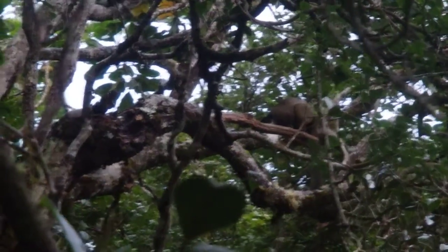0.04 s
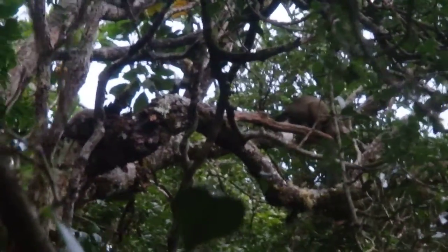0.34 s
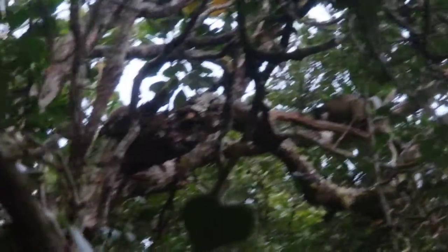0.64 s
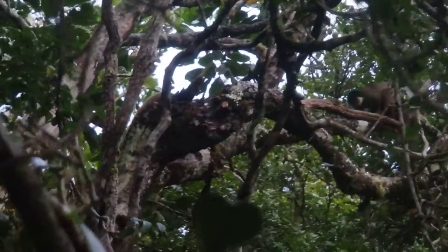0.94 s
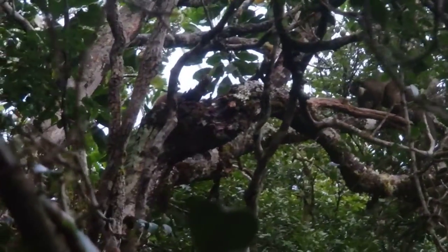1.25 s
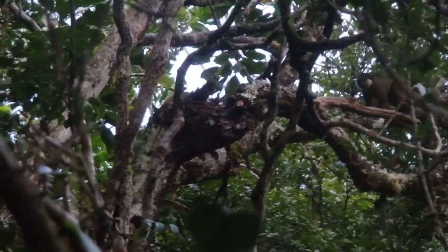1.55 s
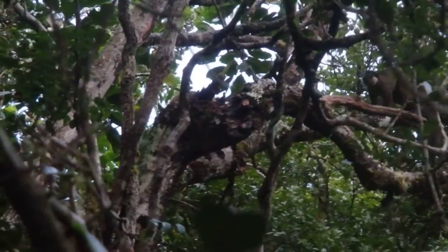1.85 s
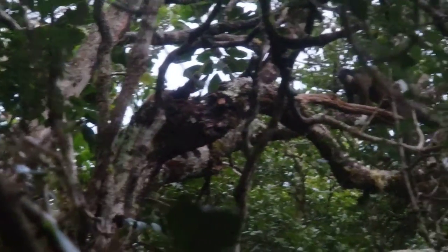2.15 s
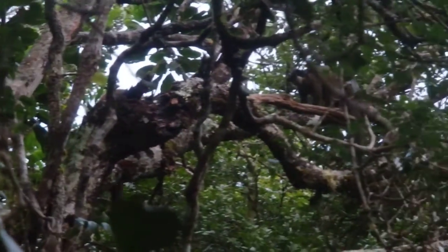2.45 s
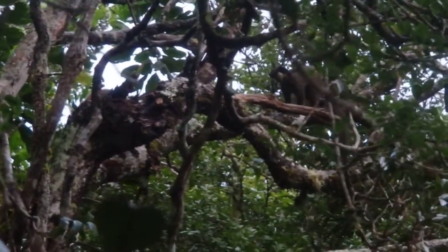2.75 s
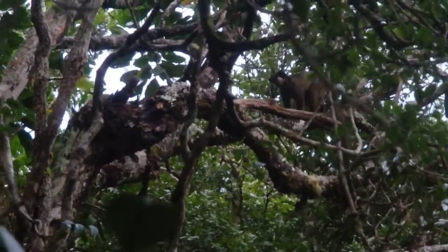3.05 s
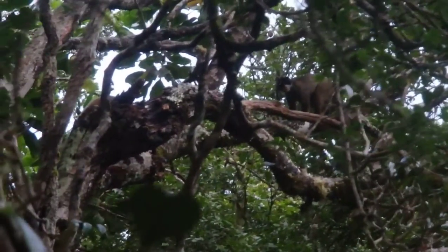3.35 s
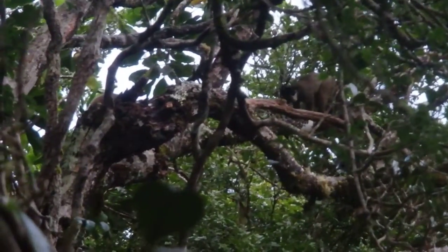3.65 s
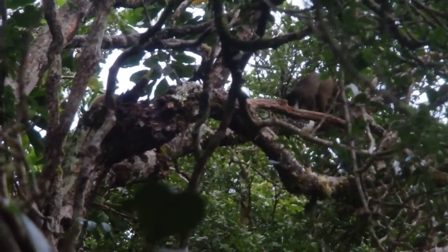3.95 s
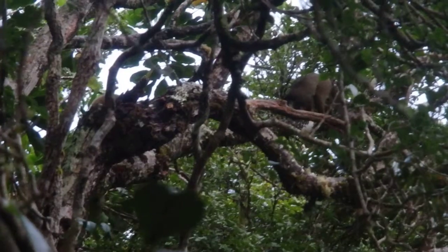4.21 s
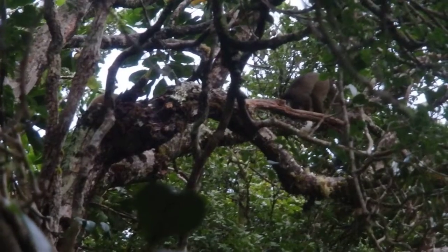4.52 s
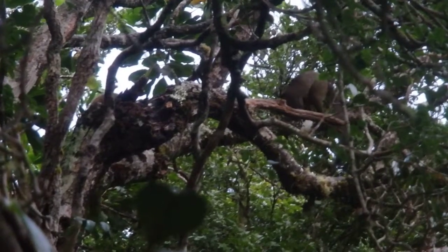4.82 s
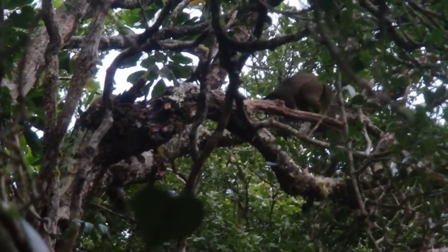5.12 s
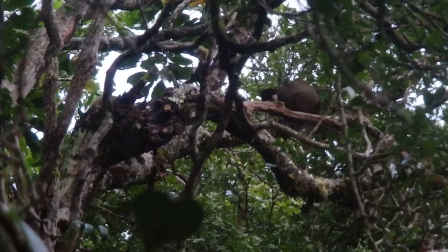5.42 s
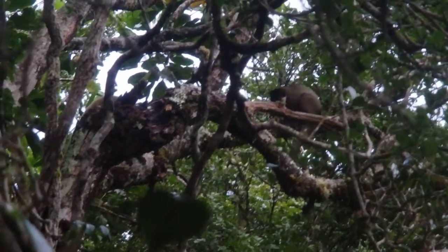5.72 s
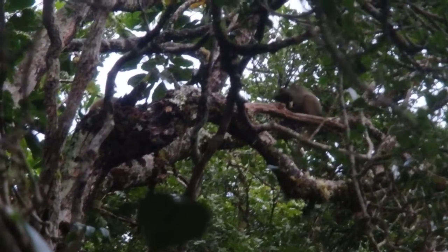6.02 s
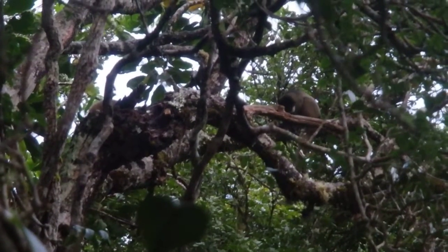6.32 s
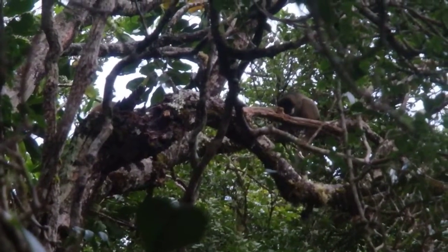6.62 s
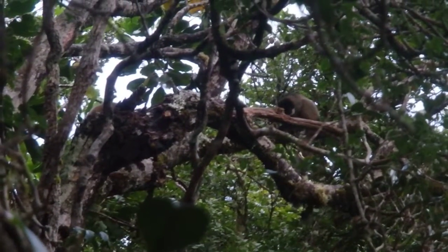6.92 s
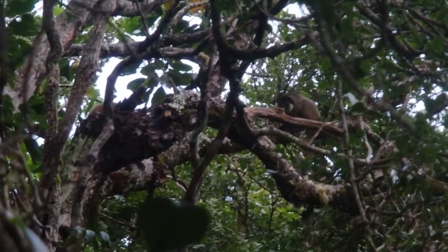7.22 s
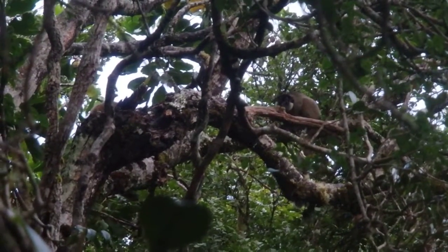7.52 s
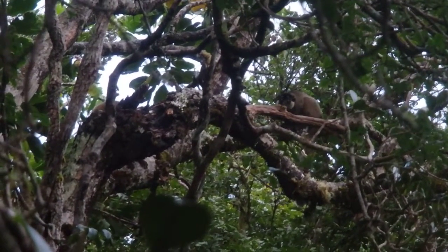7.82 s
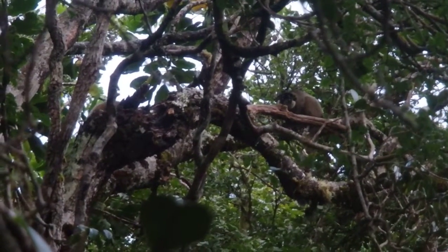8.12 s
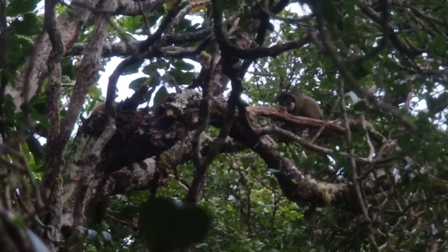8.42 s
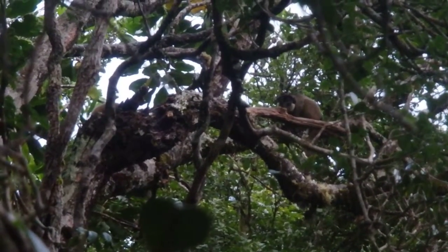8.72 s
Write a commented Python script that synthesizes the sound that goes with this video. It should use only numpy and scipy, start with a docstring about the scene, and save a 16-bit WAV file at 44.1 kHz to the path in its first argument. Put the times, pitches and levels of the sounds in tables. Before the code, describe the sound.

A lemur in a rain forest gives a series of short, hoarse, rattling grunts. It barks once, roughly, goes straight into a harsh drawn-out call, then returns to softer grunts. Trees scatter each call into a short tail. High insect trills repeat steadily over a low hush of air and leaves. Drops tick on foliage, and near the start one thuds on the microphone's housing.

```python
"""A lemur on a rain forest branch grunts, barks once, draws out a harsh rasping call and grunts again.
Its vocal folds snap in puffs of hoarse air for the grunts and pulse roughly for the bark and the call,
ringing in its throat. Insects trill and pip over the hush of the forest; drops tick on leaves and
thud on the camera body. Trunks and foliage scatter each call into a short tail."""
import sys
import numpy as np
from scipy import signal
from scipy.fft import rfft, irfft
from scipy.io import wavfile
from scipy.ndimage import uniform_filter1d

SR = 44100
rng = np.random.default_rng(int(sys.argv[2]) if len(sys.argv) > 2 else 0)


def pcm_store(signal):
    """Save signal as 16-bit PCM."""
    levels = np.round(np.clip(np.atleast_2d(signal), -1, 1) * 32767)
    wavfile.write(sys.argv[1], SR, levels.astype(np.int16).T)


N = 386316


def gain_of(db):
    """Decibels to amplitude."""
    return 10 ** (np.asarray(db) / 20)


def unit_rms(x):
    """Scales to rms 1."""
    return x / np.sqrt(np.mean(x ** 2) + 1e-20)


def curve_at(points, hz):
    """Reads a curve on a log-frequency axis."""
    f, value = np.transpose(points)
    return np.interp(np.log(hz + 1), np.log(f + 1), value)


def add(mix, s, sound):
    """Mixes a sound in at time s."""
    part = mix[..., max(round(s * SR), 0):][..., :sound.shape[-1]]
    part += sound[..., :part.shape[-1]]


def pan(side_db):
    """Left and right gains; positive leans left."""
    return gain_of([[side_db / 2], [-side_db / 2]])


def noise(colour):
    """Noise of rms 1 with the given colour."""
    eq = gain_of(curve_at(colour, np.fft.rfftfreq(N, 1 / SR)))
    return unit_rms(irfft(rfft(rng.standard_normal(N)) * eq, N))


def wander(n, per_s):
    """Smooth random modulation of rms 1."""
    at = np.arange(n) * per_s / SR
    return unit_rms(np.interp(at, np.arange(8192), rng.standard_normal(8192)))


def resonate(x, hz, width):
    """A steep resonance of gain 1 that follows the curve hz."""
    turn = np.exp(2j * np.pi * np.cumsum(hz * np.ones(len(x))) / SR)
    r = np.exp(-np.pi * width / SR)
    return 2 * (turn * signal.lfilter([(1 - r) ** 2], [1, -2 * r, r * r], x / turn + 1e-18)).real


# Stereo image of the forest, narrow lows and wide highs: (frequency [Hz], left-right correlation [0-1])
FOREST_IMAGE = [(40, 0.76), (160, 0.96), (450, 0.96), (1200, 0.9), (2000, 0.79), (3300, 0), (15000, 0)]
# Reverb time among the trees: (frequency [Hz], t60 [s])
FOREST_DECAY = [(200, 0.4), (1500, 0.32), (4000, 0.5), (9000, 0.14)]


def forest_reverb(x, fade_in_s=.0013, count=1500, spacing=22):
    """Scattering from trunks and leaves: sparse taps, each band dying at its own speed."""
    at = np.arange(count) * spacing + rng.integers(0, spacing, (2, count))
    taps = np.zeros((2, SR))
    np.put_along_axis(taps, at, rng.standard_normal(at.shape), 1)
    hz, t, bands = signal.stft(taps, SR, nperseg=256)
    alike = curve_at(FOREST_IMAGE, hz)[:, None]
    bands[1] = alike * bands[0] + np.sqrt(1 - alike ** 2) * bands[1]
    envelope = gain_of(-60 * t / curve_at(FOREST_DECAY, hz)[:, None]) * np.minimum(t / fade_in_s, 1)
    tail = signal.istft(bands * envelope, SR, nperseg=256)[1]
    return signal.fftconvolve(x[None], tail / np.linalg.norm(tail[0]), axes=1)[:, :N]


# Colour of the bed of air and leaves: (frequency [Hz], relative level [dB])
HUSH_COLOUR = [(15, -38), (25, -8.5), (107, -4), (248, -6.5), (291, -7), (392, -10), (857, -14),
               (1590, -16), (2590, -14), (3130, -20), (4210, -36), (5520, -27), (5980, -29), (11400, -28.5),
               (15800, -27)]
# Its lean across the image: (frequency [Hz], left over right [dB])
HUSH_PAN = [(60, -1.5), (300, -1.1), (2600, -2), (3600, -4), (4400, 22), (5200, 0.5), (14000, -1.5)]


def hush(level_db=-40.5, patchy_db=1.4):
    """Distant air and leaves: a noise bed that swells in small patches of time and frequency."""
    frames, hz = N // 256 + 5, np.fft.rfftfreq(1024, 1 / SR)
    a, b, c, d, patches = rng.standard_normal((frames, 513, 5)).T
    patches = unit_rms(uniform_filter1d(uniform_filter1d(patches, size=10, axis=0), size=12, axis=1))
    alike = curve_at(FOREST_IMAGE, hz)[:, None]
    left = a + 1j * b
    right = alike * left + np.sqrt(1 - alike ** 2) * (c + 1j * d)
    lean = gain_of(curve_at(HUSH_PAN, hz)[:, None] / 2)
    bands = np.array([left * lean, right / lean])
    bands *= gain_of(curve_at(HUSH_COLOUR, hz)[:, None] + patchy_db * patches)
    return gain_of(level_db) * unit_rms(signal.istft(bands, nperseg=1024, noverlap=768)[1][:, :N])


# Colour of the far insects: (frequency [Hz], relative level [dB])
CHORUS_COLOUR = [(2000, -54), (2650, 5.5), (3150, -1), (3400, -19), (3520, 8.5), (3700, 1.5), (4080, 6),
                 (4500, -4.5), (4750, -32)]


def insect_chorus(level_db=-49, flicker_db=2.2):
    """Far insects blur into a wide, flickering band of noise."""
    blur = np.array([noise(CHORUS_COLOUR), noise(CHORUS_COLOUR)])
    return pan(4) * blur * gain_of(level_db + flicker_db * wander(N, 40))


# Thin far whistles: (time [s], length [s], start pitch [Hz], end pitch [Hz], level [dB])
FAR_WHISTLES = [(0.915, 0.19, 4680, 4700, -55), (3.387, 0.25, 4760, 4750, -54),
                (5.76, 0.25, 4760, 4700, -55), (8.167, 0.28, 4760, 4700, -55),
                (.515, 0.047, 2520, 2370, -48), (2.83, 0.074, 2730, 2490, -45),
                (2.984, .07, 2610, 2330, -47), (5.21, 0.086, 2760, 2530, -45),
                (5.37, 0.075, 2720, 2590, -47)]


def whistles_and_pips(pip_s=.052, pip_hz=6230, pip_db=-60, wet_db=-16):
    """Far whistles, and an insect that pips faintly at uneven gaps."""
    out = np.zeros(N)
    gaps = .091 * rng.choice([1.2, 1, 2, 3], size=84)
    pips = [(s, pip_s, pip_hz, pip_hz, pip_db) for s in np.cumsum(gaps)]
    for s, length, start_hz, end_hz, db in FAR_WHISTLES + pips:
        n = round(length * SR)
        hz = np.linspace(start_hz, end_hz, n) * (1 + .0032 * wander(n, 220))
        add(out, s, gain_of(db) * signal.windows.tukey(n, .7) * np.sin(2 * np.pi * np.cumsum(hz) / SR))
    return pan(2.5) * (out + gain_of(wet_db) * forest_reverb(out))


# Cues for the far insect's trills: (time [s])
FAR_TRILL_CUES = [0.12, 0.871, 1.581, 2.30, 3.021, 5.10, 5.779, 6.489, 7.192, 7.879, 8.59]
# Cues for the near insect's trills: (time [s])
NEAR_TRILL_CUES = [0.213, 0.944, 1.681, 2.413, 3.109, 3.82, 4.529, 5.238, 5.937, 6.635, 7.370, 8.069]


def insect_trills(cues, top_hz, db, side_db, wet_db, note_s=.03, step_s=.0388, arch_hz=640):
    """Seven arched notes a trill, each falling further than it rose."""
    out, u = np.zeros(N), np.linspace(-1, 1, round(note_s * SR))
    for s in cues:
        for k, (tune, strength) in enumerate(rng.standard_normal((7, 2))):
            hz = top_hz * (1 + .0045 * tune) - arch_hz * (u + .14) ** 2
            note = np.cos(np.pi * u / 2) * np.sin(2 * np.pi * np.cumsum(hz) / SR)
            add(out, s + k * step_s - note_s / 2, gain_of(db + .23 * strength) * note)
    direct = np.array([out, np.roll(out, shift=3)])  # the right side hears it just later
    return pan(side_db) * (direct + gain_of(wet_db) * forest_reverb(out))


# Modes of a struck leaf: (frequency [ratio], rise and fall time [s], level [dB])
LEAF_MODES = [(0.987, 0.00039, -5), (0.8, 0.00021, -1), (1.64, 0.0004, -37), (1.6, 0.00012, -11.5),
              (0.75, 0.0024, -25.5)]
# Close drops on leaves: (time [s], gain [dB], pitch [Hz], left over right [dB])
NEAR_DRIPS = [(0.198, -24, 2700, 2), (.999, -23, 2600, 0), (5.7972, -23.5, 2630, 0),
              (5.8363, -22.5, 2700, 4), (6.9030, -23, 2500, 0), (7.037, -21, 2610, -2),
              (7.1606, -23, 3700, 13), (7.171, -24, 2400, -2), (7.392, -20.5, 2940, -10),
              (7.4673, -6, 3500, -10.5)]


def leaf_drips(splash_db=-29, far_per_s=9, far_db=-42):
    """Drops tick on leaves with a tiny splash, a few near and many far."""
    out, t = np.zeros((2, N)), np.arange(2048) / SR
    draws = rng.random((400, 4))[:round(far_per_s * N / SR)]
    far = [(when * N / SR, far_db + 9 * size, 2200 + 1500 * tune, 8 * (side - .5))
           for when, size, tune, side in draws]
    for s, db, hz, side_db in NEAR_DRIPS + far:
        tick = sum(gain_of(mode_db) * t / ring * np.exp(1 - t / ring) * np.sin(2 * np.pi * hz * ratio * t)
                   for ratio, ring, mode_db in LEAF_MODES)
        splash = gain_of(splash_db) * np.exp(-t / .0038) * rng.standard_normal(len(t))
        add(out, s, gain_of(db) * pan(side_db) * (tick + splash) / np.sqrt(2))
    return out


# Modes of the camera body: (frequency [Hz], t60 [s], level [dB])
CAMERA_MODES = [(136, 0.016, -2), (430, 0.0023, -1), (1630, .004, -25), (2920, 0.0073, -19)]
# Drops that hit it: (time [s], gain [dB], time stretch [ratio])
CAMERA_HITS = [(0.34, -1, 0.99), (7.391, -19.5, 2.1)]


def camera_knocks(attack_s=.00045):
    """Drops thud on the camera body; a softer hit is longer and lower."""
    out, t = np.zeros(N), np.arange(2048) / SR
    thud = sum(gain_of(db - 60 * t / t60) * np.cos(2 * np.pi * hz * t) for hz, t60, db in CAMERA_MODES)
    thud *= np.sin(np.pi / 2 * np.minimum(t / attack_s, 1)) ** 2  # water lands softly
    for s, db, stretch in CAMERA_HITS:
        add(out, s, gain_of(db) * np.interp(t / stretch, t, thud))
    return out


# The lemur's throat with the mouth nearly shut: (frequency [Hz], width [Hz], level [dB])
SHUT_FORMANTS = [(1937, 65, 0), (1615, 22, -24), (2730, 600, -18), (3620, 43, -18.5), (4050, 280, -32),
                 (5550, 990, -31), (7500, 700, -51)]


def snap(db, hz, swell_s=.0012):
    """One snap of the vocal folds swells, then rings in the throat, its main formant tuned to hz."""
    t = np.arange(2048) / SR
    rise, after = np.minimum(t / swell_s, 1), np.maximum(t - swell_s, 0)
    tune = hz / SHUT_FORMANTS[0][0]
    ring = sum(gain_of(mode_db) * np.exp(-np.pi * width * after)
               * np.sin(2 * np.pi * (f * tune * t + rng.random())) for f, width, mode_db in SHUT_FORMANTS)
    return gain_of(db) * rise * ring


# Full grunts, each a rattle in a puff of air: (time [s], build-up [s], snap gap [s], snap level [dB],
# decay [dB/s], main formant [Hz], rasp [dB], hiss [dB], whistle [dB])
FULL_GRUNTS = [(.2330, 0, .0131, -11.5, 380, 1876, -29.5, -37, -38),
               (.7842, 0.017, 0.011, -10.5, 600, 1873, -30, -28.5, -26.5),
               (1.7271, 0, 0.02, -8, 270, 2056, -23, -34, -33),
               (2.4186, 0, 0.012, -8, 173, 1943, -19.5, -23, -36),
               (3.162, .018, .0086, -3, 332, 2025, -17, -23, -24.5),
               (7.763, 0.011, 0.0085, -17.5, 110, 1900, -25, -27, -29),
               (8.4907, 0.012, 0.012, -12, 304, 1840, -28, -25.5, -36)]
# Double clicks that end most soft grunts:
# (time [s], gap [s], second click [dB], main formant [Hz], rasp [dB], hiss [dB])
THROAT_CLICKS = [(5.6544, .0285, -23.5, 1927, -21.5, -28), (6.2182, 0.021, -24.5, 2006, -30, -44),
                 (6.8126, .0185, -18.5, 1856, -29, -44)]


def grunt_snaps(rattle_s=.085, build_db_per_s=520, scatter_s=.0007, scatter_db=3.5, detune=.035):
    """In a full grunt the folds snap at a nearly even pace and die away raggedly; soft ones only click."""
    out = np.zeros(N)
    for s, build, gap, db, fall, hz, *_ in FULL_GRUNTS:
        for k, (late, strength, tune) in enumerate(rng.standard_normal((12, 3))):
            age = k * gap
            ragged = np.sqrt(age / rattle_s)  # the folds lose their hold as the air runs out
            level_db = db - build_db_per_s * max(build - age, 0) - fall * max(age - build, 0)
            sound = snap(level_db + scatter_db * ragged * strength, hz * (1 + detune * ragged * tune))
            add(out, s + age + scatter_s * ragged * late, sound * (age < rattle_s))
    for s, gap, db, hz, *_ in THROAT_CLICKS:
        add(out, s, snap(db + 1, hz))
        add(out, s + gap, snap(db, hz))
    return out


# Colours of a grunt's four breath layers, each: (frequency [Hz], relative level [dB])
RASP_COLOUR = [(900, -27), (1400, -16.5), (1700, -2), (1960, 0.5), (2350, -6), (2880, -23), (3300, -73),
               (5000, -75)]
HISS_COLOUR = [(2200, -60), (2900, 14.5), (3300, -29), (3800, 0), (4400, -12), (5300, -12), (6400, -25),
               (8500, -55), (12000, -47)]
NASAL_COLOUR = [(80, -23), (200, 2.5), (300, -0.5), (420, -2), (600, -0.5), (900, -13), (1500, -7),
                (2300, -30.5)]
WHISTLE_COLOUR = [(3000, -18), (3350, -15), (3550, 5), (3720, -3.5), (4000, -43)]
# Soft grunts through the nose: (time [s], nasal note [dB], hiss [dB], whistle [dB])
NOSE_GRUNTS = [(1.357, -44, -44, -36.5), (5.624, -38, -37.5, -45), (6.16, -37.5, -37, -43),
               (6.771, -38.5, -41, -46)]


def grunt_breath(attack_s=.00083, swell_s=.027, flutter_hz=105, flutter_db=7):
    """Hoarse air, chopped by slack folds, leaves by the mouth; a low nasal note swells after it."""
    rasp, nasal, hiss, whistle = np.zeros((4, N))
    t = np.arange(SR // 3) / SR
    attack = np.minimum(t / attack_s, 1)
    puff, soft_puff, click_puff = (attack * np.exp(-t / fade_s) for fade_s in (.032, .045, .0072))
    swell = (t / swell_s * np.exp(1 - t / swell_s)) ** .95
    for s, build, *_, rasp_db, hiss_db, whistle_db in FULL_GRUNTS:
        release = s + build / 2  # the air breaks through halfway up the build-up
        add(rasp, release, gain_of(rasp_db) * puff)
        add(hiss, release, gain_of(hiss_db) * puff)
        add(whistle, release, gain_of(whistle_db) * puff)
        add(nasal, release, gain_of(-38) * swell)
    for s, nasal_db, hiss_db, whistle_db in NOSE_GRUNTS:
        add(hiss, s, gain_of(hiss_db) * soft_puff)
        add(whistle, s, gain_of(whistle_db) * soft_puff)
        add(nasal, s, gain_of(nasal_db) * swell)
    for s, gap, *_, rasp_db, hiss_db in THROAT_CLICKS:  # the second lets out air and thumps in the nose
        add(rasp, s + gap, gain_of(rasp_db) * click_puff)
        add(hiss, s + gap, gain_of(hiss_db) * click_puff)
        add(nasal, s + gap, gain_of(-39.5) * click_puff)
    cycles = np.cumsum(flutter_hz * (1 + .2386 * wander(N, 90))) / SR
    flutter = unit_rms(gain_of(flutter_db * np.cos(2 * np.pi * cycles)))
    return flutter * (rasp * noise(RASP_COLOUR) + hiss * noise(HISS_COLOUR)
                      + nasal * noise(NASAL_COLOUR) + whistle * noise(WHISTLE_COLOUR))


def fold_pulses(hz, rough, jitter=.066):
    """Rough folds fall into strong and weak pulses; returns their buzz and the air they chop."""
    n = len(hz)
    doubling = .081 + .21 * rough + .09 * (1 + wander(n, 46.3))  # the subharmonics come and go
    waver = .003 * wander(n, 220)
    cycles = np.cumsum(hz * (1 + waver + jitter * rough * wander(n, 160))) / SR
    # random phase per harmonic smears each pulse over its cycle, softening the buzz
    lag = .75 * rng.random((52, 2))
    buzz = sum(np.cos(2 * np.pi * (k * cycles + lag[k, 0]))
               + doubling * np.cos(2 * np.pi * ((k - .5) * cycles + lag[k, 1])) for k in range(1, 52))
    puffs = (.5 + np.exp(-(cycles % 1) / .29)) * rng.standard_normal(N)[:n]
    return unit_rms(buzz), unit_rms(puffs)


# Chest resonances, the hum under the voice: (frequency [Hz], width [Hz], level [dB])
CHEST_FORMANTS = [(216, 85, -20), (445, 53, -21), (890, 84, -20.5)]


def harsh_voice(level_db, hz, rough, mouth_hz, formants, treble_db, chest_db, shimmer_db=2.5):
    """Ragged pulses of the folds pass the open throat and hum in the chest."""
    buzz, puffs = fold_pulses(hz, rough)
    drive = (1 - rough) * buzz + rough * puffs
    airy = drive + .22 * puffs  # the treble is always a little hoarse
    treble = sum(gain_of(db) * resonate(airy, f, width) for f, width, db in formants)
    chest = sum(gain_of(db) * resonate(drive, f, width) for f, width, db in CHEST_FORMANTS)
    mouth = resonate(airy, mouth_hz, width=215) + gain_of(treble_db) * treble
    low_cut = signal.butter(4, 1060, 'high', fs=SR, output='sos')  # a small mouth radiates no bass
    notch = signal.iirnotch(3180, Q=10, fs=SR)  # the nose swallows one band
    voice = signal.lfilter(*notch, signal.sosfilt(low_cut, mouth))
    voice += gain_of(chest_db) * (1 - rough) * chest
    voice /= np.sqrt(uniform_filter1d(voice ** 2, size=500) + 1e-12)  # the push of air sets the loudness
    return voice * gain_of(level_db + shimmer_db * rough * wander(len(hz), 110))


# Upper formants of the wide-open throat: (frequency [Hz], width [Hz], level [dB])
BARK_FORMANTS = [(1940, 190, -8.5), (2980, 370, -7.5), (3660, 260, -6), (3840, 420, -14),
                 (5490, 570, -18.5), (6900, 1700, -29)]


def bark(length_s=.108, low_hz=182.4, top_hz=241.2):
    """One short, very rough shout; pitch and level arch with the effort."""
    n = round(length_s * SR)
    effort = np.sin(np.pi * (np.arange(n) + .5) / n)
    level_db = -13 + 20 * np.log10(effort ** 2.8)
    hz = low_hz + (top_hz - low_hz) * effort
    return harsh_voice(level_db, hz, rough=.75, mouth_hz=1378, formants=BARK_FORMANTS,
                       treble_db=-2, chest_db=-3)


# Squeaks on the tail of the bark: (time [s], length [s], level [dB], centre pitch [Hz])
BARK_SQUEAKS = [(3.625, 0.013, -14.5, 3550), (3.6495, 0.0058, -7, 2800), (3.656, 0.0069, -13.5, 2790)]


def squeaks(sag_hz_per_s=16000):
    """The voice breaks into brief falling whistles."""
    out = np.zeros(N)
    for s, length, db, hz in BARK_SQUEAKS:
        t = np.arange(0, length, 1 / SR)
        pitch = (hz - sag_hz_per_s * (t - length / 2)) * (1 + .036 * wander(len(t), 1060))
        add(out, s, gain_of(db) * np.sin(np.pi * t / length) * np.sin(2 * np.pi * np.cumsum(pitch) / SR))
    return out


# Push of air in the long call, a burst and then a hold: (time [s], level before trim [dB])
CALL_ENVELOPE = [(3.83, -42), (3.836, -32), (3.89, -13.5), (3.956, -27), (4.204, -22.5), (4.596, -25),
                 (4.636, -21), (4.748, -21.5), (4.766, -19), (4.802, -23.5), (5.05, -26), (5.1, -43)]
# Its pitch rises to a plateau and sinks again: (time [s], pitch [Hz])
CALL_GLIDE = [(3.832, 187), (3.95, 191.5), (4.12, 208.1), (4.19, 214.5), (4.27, 222.7), (4.35, 220.6),
              (4.441, 222.8), (4.58, 219.5), (4.635, 214.1), (4.776, 208.3), (4.819, 193.1), (5.091, 189.8)]
# Its first formant climbs as the mouth narrows: (time [s], frequency [Hz])
CALL_MOUTH_SWEEP = [(3.83, 1395), (4.05, 1414), (4.59, 1410), (4.64, 1480), (5.09, 1510)]
# Upper formants of the open throat: (frequency [Hz], width [Hz], level [dB])
CALL_FORMANTS = [(1682, 102, -4.5), (1943, 126, -5.5), (2890, 590, -12.5), (3680, 98, -6.5),
                 (3893, 286, -4), (5770, 420, -15.5), (7400, 2100, -31)]


def long_call(slack_hz=203.3, taut_hz=220.8, closing_s=4.942, trim_db=-.5):
    """The folds tighten and slacken again: the higher the pitch, the cleaner and brighter the voice."""
    t = np.arange(CALL_ENVELOPE[0][0], CALL_ENVELOPE[-1][0], 1 / SR)
    level_db, hz, mouth_hz = (np.interp(t, *np.transpose(curve))
                              for curve in (CALL_ENVELOPE, CALL_GLIDE, CALL_MOUTH_SWEEP))
    taut = np.clip((hz - slack_hz) / (taut_hz - slack_hz), 0, 1)
    rough = .47 - .41 * taut
    opening_db = -7 * np.exp((t[0] - t) / .015)  # the treble comes as the mouth opens
    closing_db = -99 * np.maximum(t - closing_s, 0)  # and fades as it shuts
    treble_db = -4.5 + 4 * taut ** 3 + opening_db + closing_db
    return harsh_voice(level_db + trim_db, hz, rough, mouth_hz, CALL_FORMANTS, treble_db, chest_db=-4.5)


# The lemur's place in the image: (frequency [Hz], left over right [dB])
LEMUR_PAN = [(200, 0), (2300, -2), (3000, 0.5), (3550, 10.5), (4050, 5), (4700, 12), (6000, 21.5),
             (9000, 12), (15000, -2)]


def lemur(bark_at_s=3.565, wet_db=-11, right_delay_s=5.5e-5):
    """The whole voice with its reverb; it reaches the left first and its treble is shaded on the right."""
    voice = grunt_snaps() + grunt_breath()
    add(voice, bark_at_s, bark())
    add(voice, CALL_ENVELOPE[0][0], long_call())
    voice += squeaks()
    hz = np.fft.rfftfreq(N, 1 / SR)
    lean = gain_of(curve_at(LEMUR_PAN, hz))
    stereo = np.array([lean, np.exp(-2j * np.pi * hz * right_delay_s)]) * 2 / (1 + lean)
    return irfft(rfft(voice + gain_of(wet_db) * forest_reverb(voice)) * stereo, N)


def scene():
    """The lemur among insects, drips and the forest's hush."""
    near = insect_trills(NEAR_TRILL_CUES, top_hz=4063, db=-36, side_db=6.5, wet_db=-8.5)
    far = insect_trills(FAR_TRILL_CUES, top_hz=4555, db=-50.5, side_db=7.5, wet_db=-9.5)
    return (lemur() + near + far + whistles_and_pips()
            + leaf_drips() + camera_knocks() + hush() + insect_chorus())


def record(dry, whine_hz=11000, whine_db=-63.5, whine_stop_s=7.35, high_cut_hz=15850):
    """The camera adds a faint whine for a while; the mix is held to full scale and low-passed."""
    t = np.arange(N) / SR
    whine = gain_of(whine_db) * np.sin(2 * np.pi * whine_hz * t) * np.clip((whine_stop_s - t) * 20, 0, 1)
    high_cut = signal.firwin(511, high_cut_hz, window=("kaiser", 9), fs=SR)
    return signal.oaconvolve(np.clip(dry + whine, -1, 1), high_cut[None], "same")


dry = scene()
out = record(dry)
pcm_store(out)
```